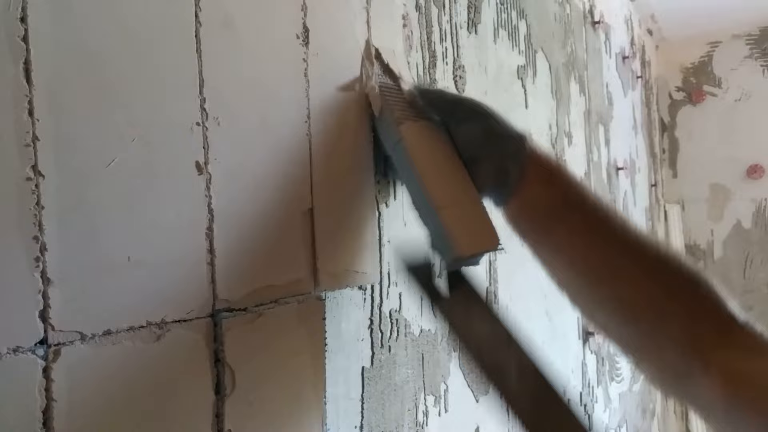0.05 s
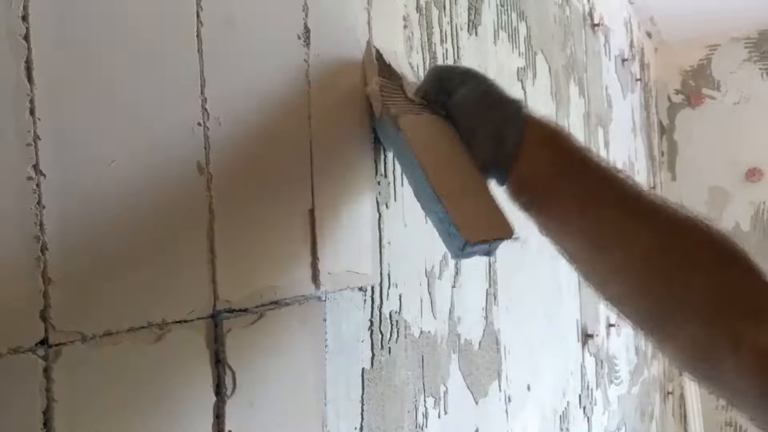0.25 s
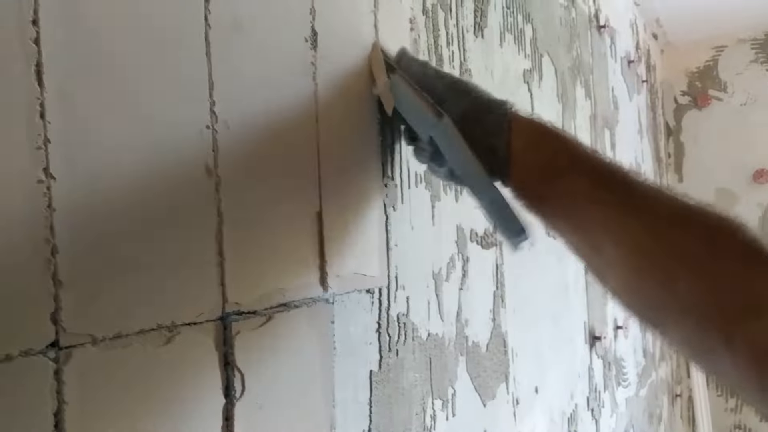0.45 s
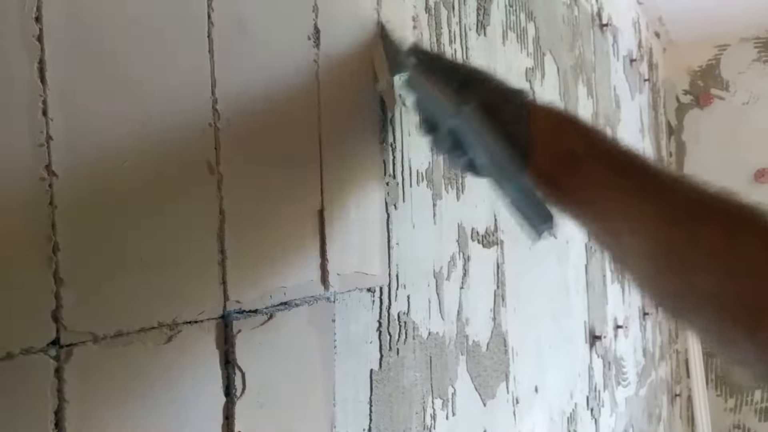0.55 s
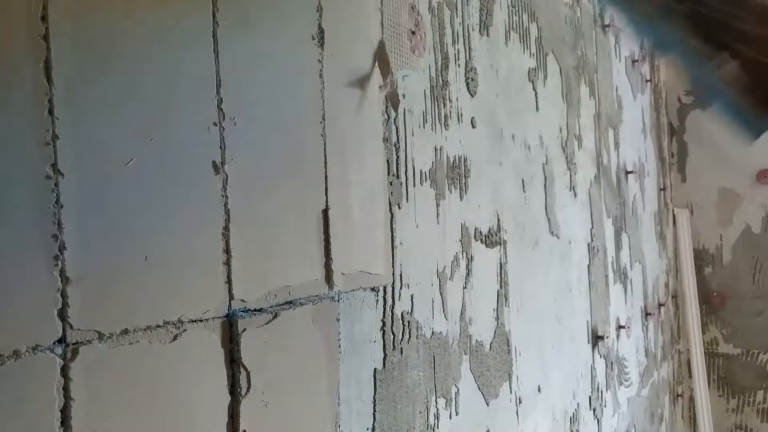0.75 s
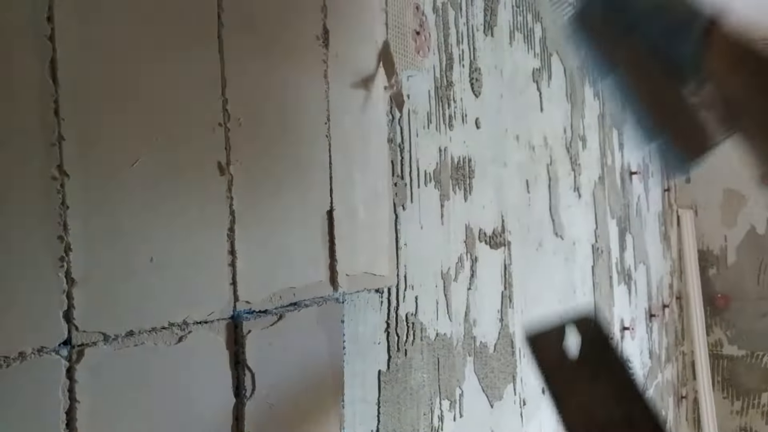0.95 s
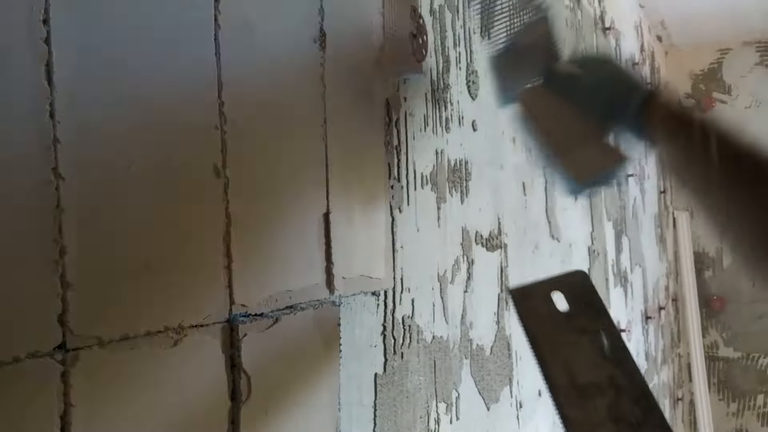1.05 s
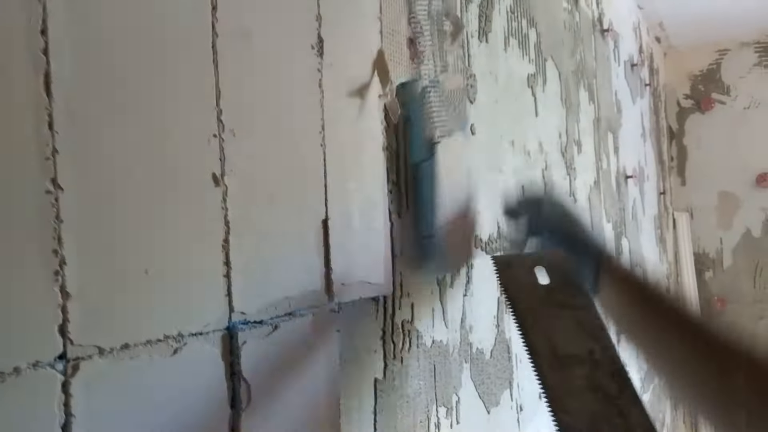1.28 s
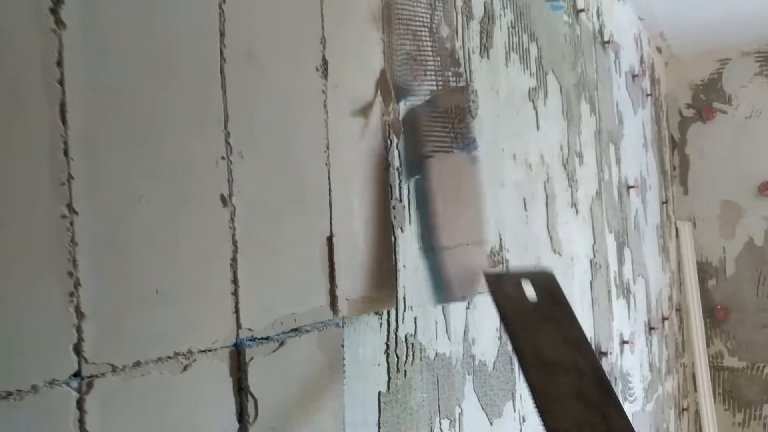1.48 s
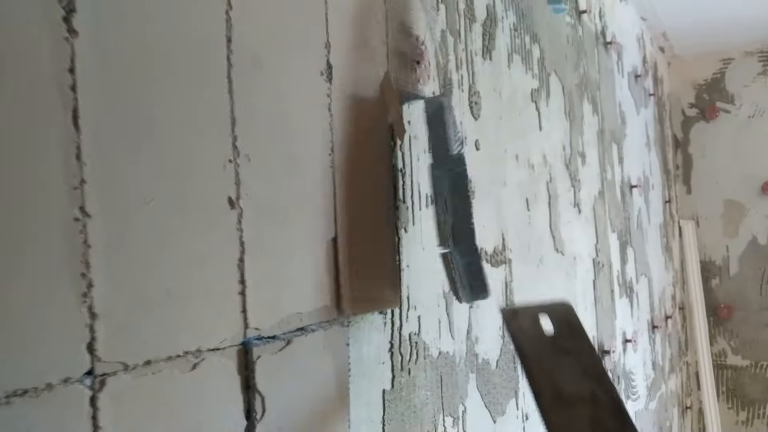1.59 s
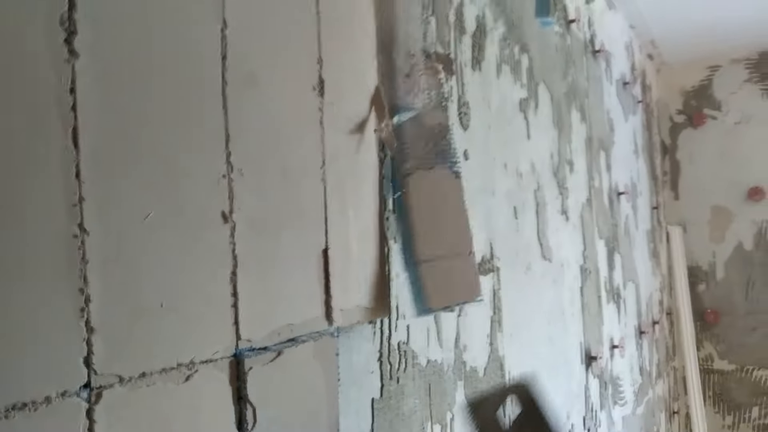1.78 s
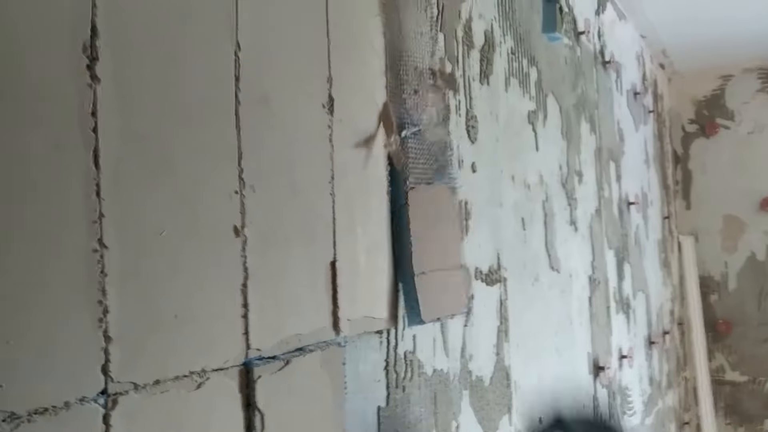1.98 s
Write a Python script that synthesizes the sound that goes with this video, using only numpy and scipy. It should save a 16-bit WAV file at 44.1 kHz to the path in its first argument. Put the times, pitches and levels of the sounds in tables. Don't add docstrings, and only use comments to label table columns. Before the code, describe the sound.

Brittle ripping of insulation board: sharp snaps and a tiny metallic tick, a short tear, a stronger one, a quieter gap, then scraping mesh and clustered hollow bumps, heard close in a bare echoing room.

```python
import sys
import numpy as np
from scipy import signal
from scipy.fft import rfft, irfft, next_fast_len
from scipy.io import wavfile
from scipy.ndimage import map_coordinates

SR = 44100
rng = np.random.default_rng(int(sys.argv[2]) if len(sys.argv) > 2 else 0)


def persist_wave(psi):
    counts = np.round(np.clip(psi, -1, 1) * 32767).astype(np.int16)
    wavfile.write(sys.argv[1], SR, np.atleast_2d(counts).T)


def boost_factor(decibels):
    exponent = np.asarray(decibels, float) / 20
    return 10 ** exponent


N = 89567

# time in seconds, level in dB.
RUBBING = [(0, -23.5), (.07, -72.5), (.1, -30), (.26, -44), (.61, -34), (1.0, -38), (1.09, -35),
           (1.13, -25), (1.23, -26.5), (1.33, -35), (1.43, -41), (1.47, -22), (1.55, -33), (1.63, -23.5),
           (1.75, -25.5), (1.82, -26.5), (1.89, -28.5), (2.03, -21)]
# pitch in Hz, level in dB.
RUB_COLOUR = [(100, -0.5), (300, -11.5), (700, -1), (1500, 3), (3100, -2), (4500, 3.5), (7000, 6.5),
              (12000, -6)]
# start in seconds, peak in dB, pitch in Hz, time to fall 60 dB in seconds.
BLADE_TOUCHES = [
    (.1495, 0, 6040, 0.035),
    (.1535, 1.5, 5400, 0.03),
    (.164, -20, 5900, 0.013),
    (1.036, -25, 5930, 0.51),
    (1.240, -12, 5960, 0.13),
    (1.252, -10, 5680, 0.15),
]
# start in seconds, peak in dB, pitch in Hz, time to fall 60 dB in seconds.
THUDS = [
    (.001, -38, 150, 0.23),
    (.47, -27.5, 310, 0.25),
    (1.139, -25, 182, 0.13),
    (1.487, -26, 160, 0.18),
    (1.568, -27.5, 177, 0.14),
    (1.906, -34.5, 200, 0.48),
]
# start in seconds, peak in dB, pitch in Hz, time to fall 60 dB in seconds.
BOARD_KNOCKS = [(.03, -32, 706, 0.05), (.124, -28, 2030, 0.12), (.279, -30, 2080, 0.23),
                (.362, -15.5, 1287, 0.79), (.363, -12.5, 2830, 0.14), (.44, -1, 2460, 0.03),
                (.449, -10.5, 2380, 0.16), (.475, -14.5, 1290, 0.11), (.486, -9.5, 1540, 0.13),
                (.657, -13.5, 1435, 0.3), (.70, -16.5, 644, 0.61), (.835, -13, 2500, 0.27),
                (1.035, -20.5, 1590, 0.058), (1.105, -33.5, 676, 1), (1.24, -30, 1460, 0.2),
                (1.439, -14, 690, 0.036), (1.446, -10.5, 2480, 0.041), (1.489, -10.5, 1910, 0.065),
                (1.5, -18.5, 2920, 0.12), (1.567, -9.5, 678, 0.066), (1.57, -14, 1540, .08),
                (1.589, -8, 1290, 0.043), (1.628, -29, 1510, 0.13), (1.61, -25.5, 894, 0.93),
                (1.681, -20, 1290, 0.12), (1.693, -6.5, 963, 0.029), (1.703, -19, 910, 0.031),
                (1.711, -13.5, 1530, 0.086), (1.719, -15, 1000, 0.14), (1.727, -10, 2200, 0.032),
                (1.731, -25, 1000, 0.066), (1.742, -25, 2040, 0.065), (1.79, -22.5, 950, 0.09),
                (1.914, -18, 1950, 0.094), (1.914, -21, 685, 0.15), (1.949, -14.5, 1490, 0.15),
                (1.962, -13, 1490, 0.031), (1.967, -12.5, 1390, 0.078), (1.973, -13, 2690, 0.062),
                (1.99, -21, 1480, 0.047), (2.008, -20, 2400, 0.042)]
# start in seconds, peak in dB, pitch in Hz, time to fall 60 dB in seconds.
CLEAN_KNOCKS = [
    (1.568, -8, 715, 0.021),
    (1.568, -13.5, 1220, 0.018),
    (1.589, -11, 1294, 0.041),
    (1.589, -9.5, 983, 0.043),
    (1.589, -17, 528, 0.083),
    (1.693, -4.5, 939, 0.055),
    (1.694, -10.5, 1600, 0.082),
    (1.966, -43, 1350, 0.034),
]
# start in seconds, peak in dB, pitch in Hz,
# time to fall 60 dB in seconds, left over right in dB.
GLUE_SNAPS = [(.001, -10, 6200, 0.015, 4), (.045, -24.5, 6300, 0.34, -3), (.074, -11, 7230, 0.3, -6.5),
              (.124, -12, 6700, 0.097, 3), (.153, -22, 6260, 0.15, 8), (.161, -28, 5840, 0.027, 0),
              (.178, -29, 5700, 0.39, -10), (.362, -6, 5930, 0.13, 4), (.4486, -16, 5700, 0.053, 8),
              (.475, -11, 6350, 0.041, -2), (.4816, -5.5, 4350, 0.06, -13), (.497, -17, 4800, 0.049, 6),
              (.616, -10.5, 4580, 0.07, -8.5), (.7416, -4, 4170, .08, -2), (.798, -4, 7000, 0.062, -4),
              (.8548, -8.5, 5020, 0.031, -15), (.864, -4.5, 6240, 0.041, 4), (.893, -19.5, 6100, .1, 4),
              (1.02, -32.5, 5730, 0.29, -12), (1.035, -22.5, 4900, 0.12, -32), (1.1, -27, 5460, 0.56, -19),
              (1.12, -15.5, 5550, 0.074, -11), (1.198, -19.5, 7700, 0.35, -12),
              (1.239, -9, 6700, 0.11, -2.5), (1.263, -24.5, 5030, 0.28, -18),
              (1.374, -30.5, 7700, 0.25, -8), (1.44, -14, 4260, 0.07, -5), (1.445, -4.5, 6260, 0.032, -6),
              (1.488, -7.5, 4850, 0.033, -10.5), (1.68, -19.5, 5300, 0.45, -29),
              (1.775, -17.5, 5500, 0.15, -27), (1.828, -7.5, 6750, 0.048, 3),
              (1.836, -14.5, 6300, 0.19, -12), (1.906, -10.5, 7050, 0.19, -7.5),
              (1.964, -14, 4700, .06, -12.5), (1.993, -12.5, 6300, 0.15, 2), (2.005, -9.5, 5570, 0.043, -9),
              (2.024, -11, 5030, 0.03, -2)]
# time in seconds, strength of the pull in dB, bending of the board in dB.
PULLS = [
    [(.275, -57, 6), (.285, -25.5, 3), (.352, -32, 0.5), (.364, -10, -2.5), (.418, -21.5, -5.5),
     (.448, -8.5, -6.5), (.5, -17, -11), (.537, -66, 29.5), (.61, -45, 1)],
    [(.648, -21.5, 7), (.653, -8.5, -2.5), (.72, -8, -1.5), (.79, -4, -6), (.815, -10, -0.5),
     (.846, -13.5, -5), (.88, -17.5, -0.5), (.955, -30, -2), (.98, -65, -3)],
]
# pitch in Hz, level in dB.
TEAR_COLOUR = [(100, -3), (300, -11), (700, -7.5), (1500, 8), (2800, -6), (4400, 10.5), (6500, 9),
               (12000, 0)]

RUB_PAN_DB, KNOCK_PAN_DB, TEAR_PAN_DB, FLEX_PAN_DB = -6.5, -2, -0.6, 1.5
LAG_S, KNOCK_LAG_S, FLEX_LAG_S, LAG_WANDER_S = 20 / 44100, 8 / 44100, 17 / 44100, 1.3 / 44100
ROOM_T60_S, ROOM_DB, WALL_CUT_HZ = 0.25, 1.5, 4500
RUMBLE_DB, RUMBLE_HZ = -49, 200
TICK_T60_S = 0.03
KNOCK_Q, KNOCK_WIDE_DB, KNOCK_DB, KNOCK_TICK_DB, KNOCK_RISE_S = 3.04, -13, -3.5, -5.5, 0.0008
SNAP_Q, SNAP_WIDE_DB, SNAP_DB, SNAP_TICK_DB, SNAP_RISE_S = 3.57, -8, -2, -10.5, 0.002
BOARD_HZ, BOARD_WIDTH_HZ, BOARD_DB, FLEX_BELOW_HZ = 1586, 77, -8.5, 3300
DIP_HZ, DIP_WIDTH_HZ, DIP_DB, BASS_CUT_HZ = 3505, 130, -5.5, 221
TOP_HZ, TOP_DB, GAP_HZ, CUTOFF_HZ = 7950, -12.5, 8300, 15800


def rms_one(x):
    return x / np.sqrt(np.mean(x ** 2) + 1e-20)


def curve(rows):
    s, *columns = np.transpose(rows)
    t = np.arange(N) / SR
    return [np.interp(t, s, column, left=-90, right=-90) for column in columns]


def drift(rate_hz):
    r = np.exp(-2 * np.pi * rate_hz / SR)
    settle = 9000
    wandering = signal.lfilter([1], [1, -2 * r, r * r], rng.standard_normal(N + settle))
    return rms_one(wandering[settle:])


def peak(x, hz, width_hz):
    r = np.exp(-np.pi * width_hz / SR)
    feedback = [1, -2 * r * np.cos(2 * np.pi * hz / SR), r * r]
    return signal.lfilter([(1 - r * r) / 2, 0, (r * r - 1) / 2], feedback, x)


def double_peak(x, hz, q):
    return peak(peak(x, hz, hz / q), hz, 2 * hz / q)


def cracks(per_s, spread_db):
    size = boost_factor(spread_db * np.minimum(rng.exponential(1, N), 5)) * rng.choice([-1, 1], N)
    happens = rng.random(N) < per_s / SR
    return rms_one(size * happens + 1e-12)


def grains(colour, per_s, spread_db, q, patchy_db):
    pitches = np.geomspace(90, 15000, 30)
    colour_hz, colour_db = np.array(colour).T
    gains_db = np.interp(np.log(pitches), np.log(colour_hz), colour_db)
    clump = drift(140)
    rows = []
    for hz, db in zip(pitches, gains_db):
        level = boost_factor(db + patchy_db * (drift(16.0) + 0.5 * clump))
        rows.append(level * double_peak(cracks(per_s, spread_db), hz, q))
    rows = np.array(rows)
    return pitches, rows / np.sqrt(np.mean(rows.sum(0) ** 2))


def place(x, pan_db, lag_s=LAG_S, wander=1):
    lag = lag_s + wander * LAG_WANDER_S * drift(21.3)
    late = map_coordinates(x, [np.arange(N) - lag * SR], order=3)
    return np.array([x * boost_factor(pan_db / 2), late * boost_factor(-pan_db / 2)])


def burst(s, db, t60, tick_db, rise_s):
    t = np.maximum(np.arange(N) / SR - s, 0)
    run = boost_factor(-60 * t / max(t60, 0.02))
    tick = boost_factor(tick_db - 60 * t / TICK_T60_S)
    return boost_factor(db) * np.minimum(t / rise_s, 1) * (run + tick)


def struck(rows, rise_s):
    s, db, hz, t60 = np.array(rows).T[:, :, None]
    t = np.maximum(np.arange(N) / SR - s, 0)
    tones = boost_factor(db - 60 * t / t60) * np.minimum(t / rise_s, 1) * np.sin(2 * np.pi * hz * t)
    return tones.sum(0)


def rumble():
    low_pass = signal.butter(2, RUMBLE_HZ, fs=SR, output="sos")
    return boost_factor(RUMBLE_DB) * rms_one(signal.sosfilt(low_pass, rng.standard_normal((2, N))))


def room(x):
    size = next_fast_len(N + SR)
    hz = np.arange(size // 2 + 1) * SR / size
    lags = rng.uniform(0.008, 0.035, (2, 16, 1))
    dulling = np.sqrt(1 + (hz / WALL_CUT_HZ) ** 4 * lags * 20)
    loop = boost_factor(-60 * lags / ROOM_T60_S) * np.exp(-2j * np.pi * hz * lags) / dulling
    echoes = (loop / (1 - loop)).sum(1) / 4
    return boost_factor(ROOM_DB) * irfft(rfft(x, size) * echoes, size)[:, :N]


def rustle():
    _, rows = grains(RUB_COLOUR, per_s=2300, spread_db=0.57, q=5.4, patchy_db=4.5)
    return place(boost_factor(curve(RUBBING)[0] + 3.0) * rows.sum(0), RUB_PAN_DB)


def blade():
    return place(struck(BLADE_TOUCHES, rise_s=0.00027), 0)


def clean_knocks():
    return place(struck(CLEAN_KNOCKS, rise_s=0.0024), KNOCK_PAN_DB, KNOCK_LAG_S)


def knocks():
    drag = [cracks(4000, 1.5) * boost_factor(1.8 * drift(100)) for _ in range(3)]
    band = signal.butter(2, [250, 3000], "band", fs=SR, output="sos")
    wide = rms_one(signal.sosfilt(band, drag[2]))
    out = 0
    for k, (s, db, hz, t60) in enumerate(BOARD_KNOCKS + THUDS):
        ring = rms_one(double_peak(drag[k % 2], hz, KNOCK_Q))
        loudness = burst(s, db + KNOCK_DB, t60, KNOCK_TICK_DB, KNOCK_RISE_S)
        out = out + loudness * (ring + boost_factor(KNOCK_WIDE_DB) * wide)
    return place(out, KNOCK_PAN_DB, KNOCK_LAG_S, wander=8.6)


def snaps():
    spray = [cracks(9000, 2.8) * boost_factor(0.5 * drift(150)) for _ in range(3)]
    high_pass = signal.butter(2, 3600, "high", fs=SR, output="sos")
    wide = rms_one(signal.sosfilt(high_pass, spray[2]))
    out = 0
    for k, (s, db, hz, t60, pan_db) in enumerate(GLUE_SNAPS):
        ring = rms_one(double_peak(spray[k % 2], hz, SNAP_Q))
        sides = boost_factor(np.clip(pan_db, -10, 3) * np.array([[0.5], [-0.5]]))
        loudness = burst(s, db + SNAP_DB, t60, SNAP_TICK_DB, SNAP_RISE_S)
        out = out + sides * loudness * (ring + boost_factor(SNAP_WIDE_DB) * wide)
    left, right = out
    return np.array([left, place(right, 0)[1]])


def tearing():
    pitches, rows = grains(TEAR_COLOUR, per_s=7000, spread_db=1.5, q=4.25, patchy_db=2.0)
    low = rows[pitches < FLEX_BELOW_HZ].sum(0)
    high = rows[pitches >= FLEX_BELOW_HZ].sum(0)
    board = boost_factor(BOARD_DB) * rms_one(peak(cracks(2700, 1.1), BOARD_HZ, BOARD_WIDTH_HZ))
    first, second = curve(PULLS[0]), curve(PULLS[1])
    pull = boost_factor(first[0]) + boost_factor(second[0])
    flex = boost_factor(sum(first) + 7.0) + boost_factor(sum(second) + 6.0)
    bright = pull * high + boost_factor(sum(second)) * board
    bright = place(bright, TEAR_PAN_DB, wander=1.57)
    return bright + place(flex * low, FLEX_PAN_DB, FLEX_LAG_S, wander=1.93)


def scene():
    sources = rustle() + blade() + clean_knocks() + knocks() + snaps() + tearing()
    return rumble() + room(sources.mean(0)) + sources


def top_cut(x):
    return signal.sosfilt(signal.butter(12, 15800, fs=SR, output="sos"), x)


def record(dry):
    hz = np.arange(N // 2 + 1) * SR / N + 1
    dip = boost_factor(DIP_DB * np.exp(-((hz - DIP_HZ) / DIP_WIDTH_HZ) ** 2))
    bass_cut = 1 / (1 + (BASS_CUT_HZ / hz) ** 2)
    main_band = 1 / (1 + (hz / TOP_HZ) ** 60)
    weak_treble = boost_factor(TOP_DB) / (1 + np.minimum(GAP_HZ / hz, 9) ** 80) * (hz < CUTOFF_HZ)
    heard = irfft(rfft(dry) * dip * bass_cut * (main_band + weak_treble), N)
    return top_cut(np.clip(heard, -1, 1))


dry = scene()
out = record(dry)
persist_wave(out)
```